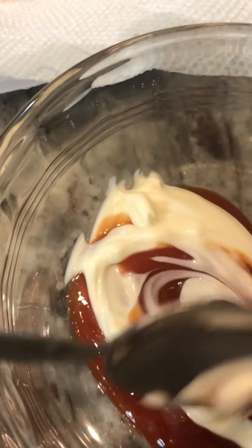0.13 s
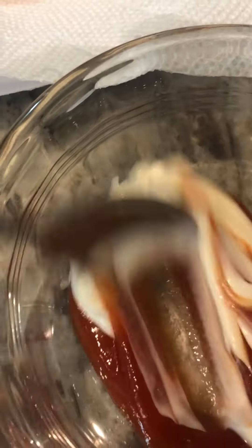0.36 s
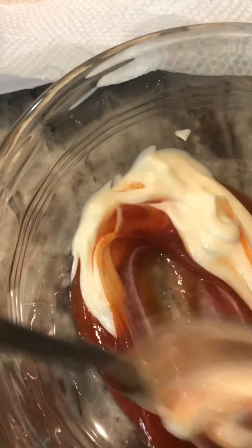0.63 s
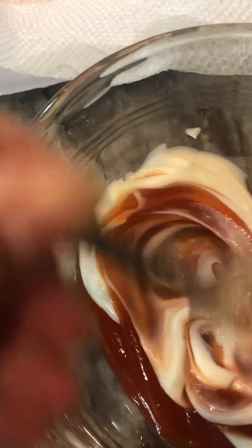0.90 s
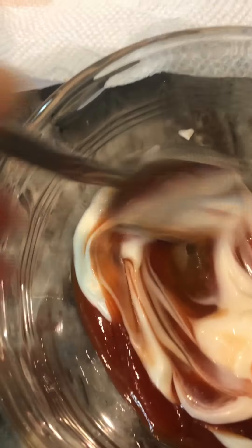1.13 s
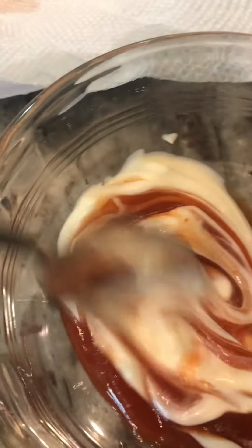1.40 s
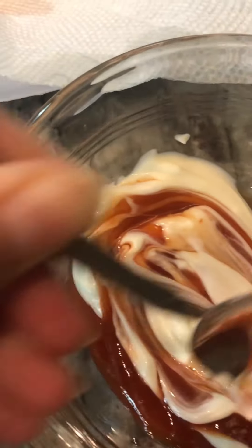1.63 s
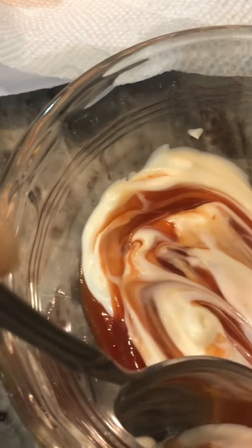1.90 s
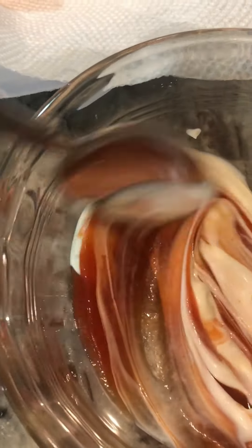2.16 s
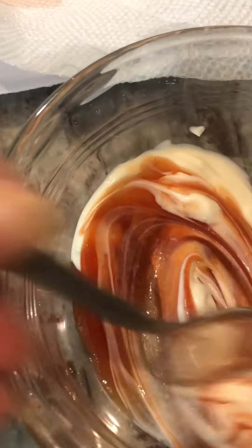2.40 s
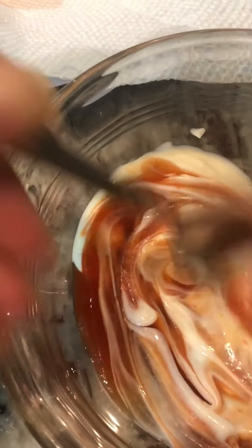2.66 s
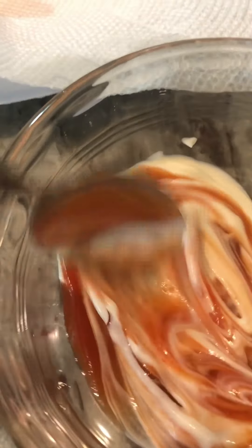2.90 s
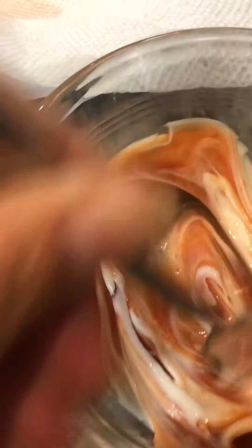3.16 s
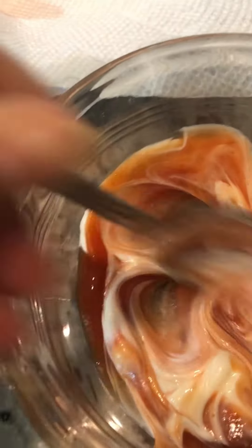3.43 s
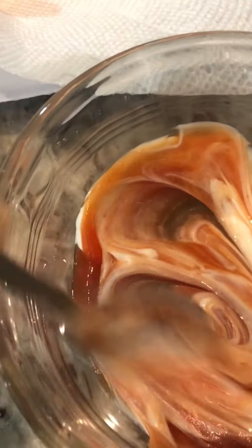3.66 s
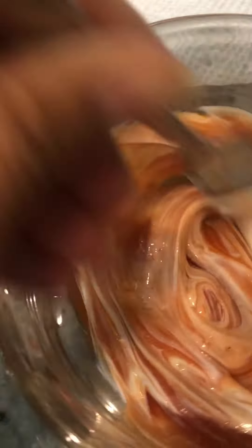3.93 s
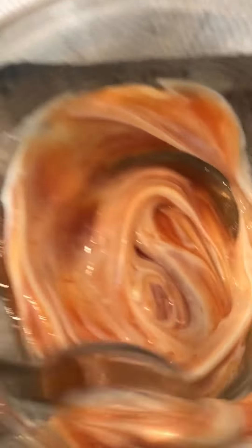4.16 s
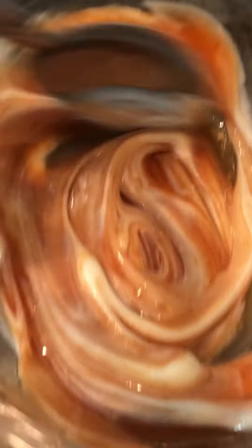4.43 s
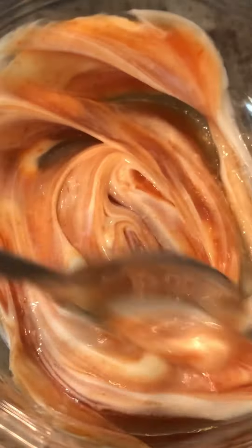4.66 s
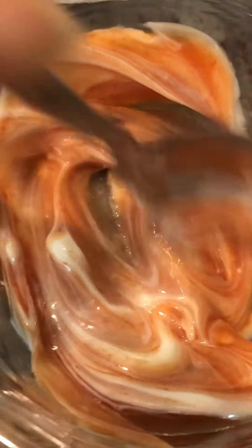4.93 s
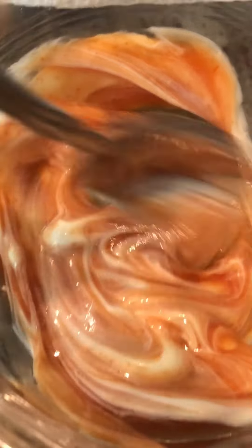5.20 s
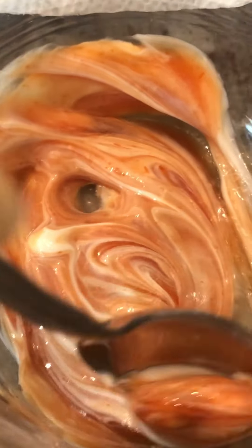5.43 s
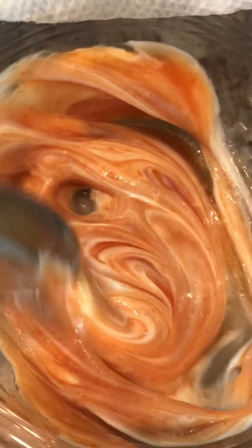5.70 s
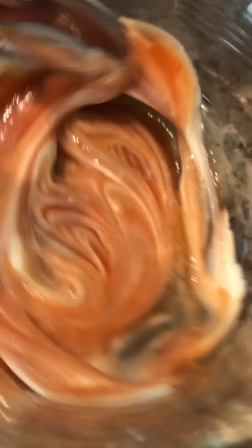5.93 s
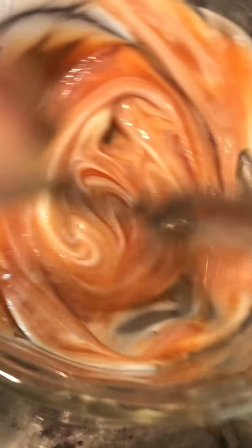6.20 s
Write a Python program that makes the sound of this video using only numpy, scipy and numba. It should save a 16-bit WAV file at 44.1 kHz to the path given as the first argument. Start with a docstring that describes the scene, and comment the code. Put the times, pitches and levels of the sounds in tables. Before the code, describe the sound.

Very close to a phone in a quiet kitchen with a soft, low appliance hum and a short hard-surfaced echo, a steel fork stirs thick sauce in a glass bowl. After a faint tick, firm bright clinks land at about 0.25, 0.46 and 0.57 s, then a run of light ticks and short gritty scrapes continues to 1.3 s. Single clinks come at 1.5 and 1.9 s, a stronger one at 2.2, and a sharp pair at 2.9. Rapid chattering scrapes follow. The hardest knock hits at 3.7 s, with a dull counter thump and brief glassy ring; more clinks fall at 3.8, 4.2 and 4.4. A tiny squeak at 4.5 and a longer, clean gliding squeak near 5 s sit among softer scrapes. Firm clinks at 5.4 and 5.7 s give way to scraping and faint catches until about 6.3 s.

```python
"""A steel fork stirs thick sauce in a glass bowl, close to a phone in a quiet kitchen with a soft hum.
Firm blows come from 0.25 s, then a run of light catches; noisy scrapes of the tines fill the gaps.
The hardest knock falls at 3.7 s; near 4.5 and 5 s a tine squeaks, as gliding tones with overtones.
Two more firm blows come at 5.4 and 5.7 s, then scraping and faint catches to the end.
Knocks are chatter driving damped modes, over a dull counter thump; the bare rim rings on as sines."""
import sys
import numpy as np
from scipy import signal
from scipy.fft import rfft, irfft
from scipy.io import wavfile
from scipy.ndimage import uniform_filter1d, minimum_filter1d
from numba import njit

SR = 44100
rng = np.random.default_rng(int(sys.argv[2]) if len(sys.argv) > 2 else 0)


def to_wav(sig):
    """Store sig (one row per channel, or 1-D mono) as 16-bit WAV at the path in sys.argv[1].

    Samples outside -1..1 are clipped; the rate is SR.
    """
    pcm = np.clip(np.atleast_2d(sig), -1, 1) * 32767
    pcm = np.round(pcm).astype(np.int16)
    wavfile.write(sys.argv[1], SR, pcm.T)  # frames by channels


def volts_from_decibels(level):
    """Turn decibel levels (scalar or array-like) into linear amplitude factors."""
    exponent = np.asarray(level, float) / 20
    return 10 ** exponent


N = 278712
T = np.arange(N) / SR


def level(x, db):
    """Scale to an rms level."""
    return x * volts_from_decibels(db) / np.sqrt(np.mean(x ** 2))


def add(out, start_s, x):
    """Mix x into out from start_s."""
    i = int(start_s * SR)
    out[i:i + len(x)] += x[:N - i]


def ring(t, hz, t60):
    """A decaying sine that falls 60 dB in t60 seconds."""
    return np.exp(-np.log(1000) * t / t60) * np.sin(2 * np.pi * hz * t)


def ring_width(t60):
    """Bandwidth in Hz of a mode with this t60; the same formula turns a width into a t60."""
    return np.log(1000) / (np.pi * t60)


def resonate(x, hz, t60):
    """Drive one decaying mode with x."""
    radius = np.exp(-np.log(1000) / (t60 * SR))
    poles = [1, -2 * radius * np.cos(2 * np.pi * hz / SR), radius * radius]
    return signal.lfilter([1 - radius], poles, x) * np.sin(2 * np.pi * hz / SR)


def walk(rate):
    """Random levels held 1 / rate s and slewed; spread near 1."""
    k = int(SR / rate)
    return 1.3 * uniform_filter1d(np.repeat(rng.standard_normal(N // k + 1), k), k)[:N]


@njit
def svf(x, hz, width):
    """State-variable band-pass whose centre moves, gain 1 at the centre."""
    y, b, l = np.empty(len(x)), 0., 0.
    for i in range(len(x)):
        g, k = np.tan(np.pi * hz[i] / SR), width / hz[i]
        v = (b + g * (x[i] - l)) / (1 + g * (g + k))
        b, l, y[i] = 2 * v - b, l + 2 * g * v, k * v
    return y


def band(x, modes):
    """Broad band that spans a group of modes, its top edge held to 9860 Hz."""
    edges = [0.79 * modes[0][0], min(1.27 * modes[-1][0], 9860)]
    return signal.sosfilt(signal.butter(2, edges, "band", fs=SR, output="sos"), x)


# the fork's three strongest modes shift as its grip and depth change:
# (time [s], tine [Hz], neck [Hz], tip [Hz])
FORK_PITCHES = [(0.0, 2370, 3860, 6470), (1.021, 2056, 4116, 6570), (1.881, 2400, 3846, 6590),
                (2.529, 2053, 4274, 6910), (3.339, 2240, 3930, 6270), (5.071, 2450, 4200, 6630),
                (5.23, 2414, 3830, 6270), (6.32, 2207, 4140, 6290)]


def main_pitches(s):
    """Pitch of each main mode at times s: the bowl's stays, the fork's three move."""
    bowl_hz = 1356.
    when, *fork = np.transpose(FORK_PITCHES)
    return [np.full(np.shape(s), bowl_hz)] + [np.interp(s, when, hz) for hz in fork]


# spectrum of the room's air, before scaling: (frequency [Hz], level [dB])
AIR_SPECTRUM = [(24, -29.5), (44, -6), (140, -3.5), (182, -14.5), (202, -7), (324, -4.5), (492, -20),
                (591, -8.5), (709, -20), (767, -18.5), (1870, -26.5), (15500, -36)]
# appliance hum bands: (frequency [Hz], width [Hz], level [dB])
HUM_BANDS = [(217.3, 7.9, -68), (332, 36, -68), (420, 49, -67), (586.5, 120, -70), (828, 2.9, -76.5)]


def kitchen(air_db=-60.5, waver_db=0.76):
    """Shaped noise gives the room tone; narrow noise bands give a wavering hum."""
    f = np.maximum(np.arange(N // 2 + 1) * SR / N, 1)
    hz, db = np.transpose(AIR_SPECTRUM)
    shape = volts_from_decibels(np.interp(np.log(f), np.log(hz), db))
    air = irfft(rfft(rng.standard_normal(N)) * shape, N)
    hum = sum(level(resonate(rng.standard_normal(N), hum_hz, ring_width(width)), hum_db)
              for hum_hz, width, hum_db in HUM_BANDS)
    return level(air, air_db) * volts_from_decibels(waver_db * walk(1.0)) + hum


def room(x, t60=0.19, tail_db=-21, dull_hz=5800, rise_s=0.0026):
    """Short diffuse tail of hard kitchen surfaces, duller than the source."""
    t = T[:int(.4 * SR)]
    tail = rng.standard_normal(len(t)) * np.exp(-np.log(1000) * t / t60) * (1 - np.exp(-t / rise_s))
    tail = signal.sosfilt(signal.butter(1, dull_hz, fs=SR, output="sos"), tail)
    return volts_from_decibels(tail_db) * signal.fftconvolve(x, tail / np.sqrt(np.sum(tail ** 2)))[:N]


# counter modes: (frequency [Hz], t60 [s], relative level [dB])
COUNTER_MODES = [(90, 0.11, -14.5), (202, 0.025, -6.5), (427, 0.084, 4.5), (537, 0.04, -2.5),
                 (710, 0.025, 3)]


def thuds(thud_db=-24, rock_s=0.014, top_db=-13):
    """The counter under the bowl answers the blows with a dull, short thump as the bowl rocks."""
    out, t = np.zeros(N), T[:int(.15 * SR)]
    shape = sum(volts_from_decibels(db) * ring(t, hz, t60) for hz, t60, db in COUNTER_MODES)
    for s, bowl_db, *_ in KNOCKS:
        rock = rng.standard_normal(len(t)) * np.exp(-t / rock_s)
        thump = signal.fftconvolve(rock / np.linalg.norm(rock), shape)[:len(t)]
        # blows above top_db thump no harder
        add(out, s, volts_from_decibels(min(bowl_db, top_db) + thud_db) * thump)
    return out


def catches(per_s):
    """Tiny random catches of steel on glass, a few much larger than the rest."""
    size_db = np.minimum(4 * rng.exponential(size=N), 14)
    hits = rng.random(N) < per_s / SR
    return level(hits * volts_from_decibels(size_db) * np.sign(rng.standard_normal(N)), 0)


# strokes of the tines over the glass:
# (start [s], length [s], fork level [dB], tilt towards the tip [dB], bowl level [dB])
STROKES = [(0.276, 0.098, -58, -1.5, -60), (0.471, 0.23, -58, 3, -55.5), (0.77, 0.079, -52, 1, -57.5),
           (0.866, 0.087, -51, 3, -60), (1.01, 0.031, -52, 2.5, -59), (1.073, 0.054, -54.5, -1, -61),
           (1.147, 0.097, -52.5, 3, -59), (1.276, 0.14, -64.5, 1.5, -67), (1.567, 0.12, -74.5, 0, -61.5),
           (1.924, .08, -64, -7, -58), (2.06, 0.095, -56.5, 3.5, -53), (2.24, 0.099, -52, 3.5, -52),
           (2.367, 0.08, -62, 1, -56.5), (2.454, 0.16, -59, -1.5, -65), (2.653, 0.062, -50, 1.5, -58),
           (2.825, 0.081, -54, 0.5, -66), (2.97, .07, -60, -3, -52), (3.048, .13, -50, -1, -55),
           (3.31, 0.058, -55, 0.5, -60), (3.458, 0.14, -61, -3, -61), (3.704, 0.14, -57, 3.5, -54),
           (3.875, .14, -56, -2, -52), (4.223, .12, -57.5, 4.5, -50.5), (4.397, .06, -58.5, 4.5, -48),
           (4.488, 0.064, -49, -3, -50), (4.678, 0.13, -57, 0.5, -61), (4.85, 0.19, -54.5, -3, -57.5),
           (5.076, 0.12, -68.5, -7.5, -67), (5.203, 0.086, -57, 2, -58.5), (5.455, 0.17, -66.5, -6, -59.5),
           (5.714, .15, -59, 4.5, -48), (5.853, 0.15, -70, 0, -45.5), (6.006, 0.14, -55, -3.5, -53.5),
           (6.177, 0.12, -65.5, -7, -48)]


def pressure(press=499.5, lift=449, bowl_lift=148.5):
    """Rubbing level in dB of bowl, tine, neck and tip: each stroke bites, holds and lifts off (dB/s)."""
    out = np.full((4, N), -95.)
    fall = np.array([[bowl_lift]] + [[lift]] * 3)
    for s, length, fork_db, tilt_db, bowl_db in STROKES:
        hold = np.array([[bowl_db], [fork_db - tilt_db], [fork_db], [fork_db + tilt_db]])
        before, after = np.maximum(s - T, 0), np.maximum(T - s - length, 0)
        out = np.maximum(out, hold - press * before - fall * after)
    return out


# broad rubbing noise beside the main mode of bowl, tine, neck and tip: (level [dB]) each
GRIT_DB = [-9.5, -10.5, -9.5, -6]
# smooth drag of sauce beside the catches, for bowl, tine, neck and tip: (level [dB]) each
WET_DB = [4, -9, -7, -2]


def scrape(wander=0.016, edge_hz=11800., edge_db=-9):
    """Rubbing noise and tiny catches come in surges and drive the moving modes of the fork."""
    columns = pressure()
    stutter, per_s = walk(70) + walk(20), 400
    shared = catches(2 * per_s) + volts_from_decibels(-1) * rng.standard_normal(N)
    shared = shared * volts_from_decibels(2.5 * stutter)
    out = 0
    groups = zip(columns, DAMPED_MODES, main_pitches(T), MAIN_MODES, GRIT_DB, WET_DB)
    for db, modes, hz, (width, _, _), grit_db, wet_db in groups:
        # each part chatters on its own, so each main mode gets its own catches
        force = catches(per_s) + volts_from_decibels(wet_db) * rng.standard_normal(N)
        force = force * volts_from_decibels(4 * walk(45) + 3 * walk(14)) + volts_from_decibels(-8) * shared
        main = svf(force, hz * (1 + wander * walk(25)), 1. * width)
        part = level(main, 0) + level(band(shared, modes), grit_db)
        out = out + volts_from_decibels(db) * level(part, 0)
    # a bright edge follows the tip's pressure
    edge = svf(catches(4 * per_s) * volts_from_decibels(3 * stutter), np.full(N, edge_hz), 500.)
    out = out + volts_from_decibels(edge_db + columns[-1]) * level(edge, 0)
    # the drag keeps the rim faintly singing
    singing = sum(volts_from_decibels(db) * svf(out, np.full(N, 1. * hz), ring_width(t60))
                  for _, hz, t60, db in RIM_MODES)
    return out + singing


# stick-slip locked to a tine: (start [s], length [s], settled pitch [Hz], level at the end [dB])
SQUEAKS = [(4.517, .005, 2380, -31), (4.534, 0.011, 2364, -27), (4.955, 0.07, 2349, -25.5)]
# fundamental and two overtones: (level [dB]) each
OVERTONES_DB = [-0.5, -18, -25]


def squeaks(waver=0.00366, flutter_db=1.32):
    """A tine sticks and slips at its own pitch: a clean tone with two overtones."""
    sag_hz, sag_s, swell = 100, 0.0097, 92  # pitch starts high and settles while it grows (dB/s)
    bite, cut_db, cut_s, fade = 2202, 20, .007, 201  # onset (dB/s), sudden slip, dying ring (dB/s)
    unsettled, rasp = 0.35, 0.36  # overtones wait for the pitch to settle (dB/Hz) and are rough
    out = 0
    for s, length, hz, end_db in SQUEAKS:
        since, past = T - s, np.maximum(T - s - length, 0)
        sharp = sag_hz * np.exp(-np.maximum(since, 0) / sag_s)
        pitch = hz + sharp
        phase = 2 * np.pi * np.cumsum(pitch * (1 + waver * walk(140))) / SR
        db = end_db - swell * np.clip(length - since, 0, length) - bite * np.maximum(-since, 0)
        db = db - cut_db * np.minimum(past / cut_s, 1) - fade * past
        for k, over_db in enumerate(OVERTONES_DB):
            flutter = (k + 2.0) * flutter_db * walk(120)
            gain = volts_from_decibels(db + over_db - k * unsettled * sharp + flutter)
            gain = gain * (1 + k * rasp * walk(700))
            out = out + np.sqrt(2) * gain * np.sin((k + 1) * phase)
    return out


# blows that set the rim ringing: (time [s], level [dB], favoured mode order 0-3,
# loss per order away [dB], upper twin of the split pair [dB])
RINGS = [(.2488, -35, 0., 6, -17), (.4623, -31.5, 0., 8, -1), (.5651, -28.5, 0., 6.5, -10.5),
         (.7609, -31.5, 2.1, 14, -17), (.9266, -40, 0., 26, 0), (1.2155, -45, 0., 26, 0.5),
         (1.5355, -38.5, 0., 14, 5), (1.8927, -28, 2.9, 3, -6), (2.0556, -39, 1.1, 9.5, 4),
         (2.9109, -25.5, 0., 9, 7), (2.9491, -21, 2.4, 8, 11), (3.2829, -51, 1.3, -2, -1),
         (3.7111, -19.5, 1.01, 9.5, 1), (3.8317, -32.5, 1.6, 13.5, -17), (4.2169, -13, 2.2, 7, 17),
         (4.3799, -20.5, 0., 27.5, -8), (5.4238, -26.5, 0., 4.5, -15.5), (5.6891, -16.5, 2.95, 6, 16.5),
         (6.2297, -31.5, 0., 41.5, 0)]
# rim modes: (place in RIM_ORDERS, frequency [Hz], t60 [s], relative level [dB])
RIM_MODES = [(0, 1420, .17, 0), (1, 3238, .19, -1), (2, 5658, .2, 0), (3, 5722, .08, -3), (4, 8708, .1, 0),
             (1, 3290, .12, -10), (1, 3230, .7, -17), (2, 5645, .6, -16), (4, 8690, .35, -18),
             (4, 12310, .16, -11)]
# mode order at each place; order 2 is a split pair: (order) each
RIM_ORDERS = np.array([0, 1, 2, 2, 3])


def rim(rise_s=0.00041, detune=0.00077, tremble_db=2.5):
    """The free wall of the bowl rings from the nearest knock on; its close modes beat."""
    out, t, blows = np.zeros(N), T[:int(.6 * SR)], np.transpose(KNOCKS)[0]
    for s, top_db, order, fall_db, twin_db in RINGS:
        start_db = top_db - fall_db * abs(RIM_ORDERS - order)
        start_db = start_db + twin_db * (np.arange(5) == 3)  # place 3 is the upper twin
        chance = rng.standard_normal(len(RIM_MODES))
        x = sum(volts_from_decibels(start_db[int(round(k))] + db) * ring(t, hz * (1 + detune * c), t60)
                for (k, hz, t60, db), c in zip(RIM_MODES, chance))
        nearest = blows[np.argmin(abs(blows - s))]
        add(out, nearest, x * (1 - np.exp(-t / rise_s)))
    # the fork stays in touch, so the ring trembles
    return out * volts_from_decibels(tremble_db * walk(90))


# tines, neck and tip along the fork: (place, 0 tines to 1 tip) each
PART_SPOTS = np.array([0, .5, 1])


def struck(fork_db, spot, soft):
    """Level of tines, neck and tip: the part nearest the contact sounds most, more so for light catches."""
    hard_fall_db, soft_fall_db = 12.5, 31  # loss over the fork's whole length
    fall_db = hard_fall_db + (soft_fall_db - hard_fall_db) * soft
    return fork_db - fall_db * abs(PART_SPOTS - np.clip(spot, 0, 1))


# fork meets glass, levels as rms of the first 5 ms:
# (time [s], bowl level [dB], fork level [dB], spot on the fork 0 tines to 1 tip)
KNOCKS = [(0.1743, -51, -60.5, 0.), (0.2487, -25, -16, 0.9), (0.307, -66, -35, 0.76), (.462, -19.5, -16, 1),
          (0.492, -52, -36, .99), (.5653, -21.5, -19.5, 0.88), (.6533, -79, -32.5, 0.83),
          (0.737, -71, -39, 0.26), (.7615, -30, -28.5, 0.73), (.819, -68, -38.5, 0.18),
          (0.8827, -65, -39, .99), (0.9252, -68, -29, 0.68), (0.94, -52, -41, .5), (1.009, -71, -42, .99),
          (1.026, -73, -34, 0.41), (1.043, -70, -47, 0.98), (1.076, -65, -43, .99),
          (1.0844, -70, -47, 0.055), (1.101, -60, -46, 0.), (1.147, -73, -44.5, 0.), (1.185, -70, -39, 0.),
          (1.2155, -78.5, -34.5, 1), (1.319, -72, -57.5, .5), (1.5351, -24, -21.5, 0.89),
          (1.596, -47, -51, 0.84), (1.8927, -28.5, -20.5, 0.46), (2.056, -35.5, -33.5, .3),
          (2.134, -44, -33.5, 0.71), (2.1504, -70, -46, .99), (2.2225, -18, -12, 0.94),
          (2.3437, -66, -46, 0), (2.496, -74, -44, .52), (2.6719, -73, -34, 0.3), (2.714, -76, -33.5, 1),
          (2.7365, -49.5, -41, 0.96), (2.806, -63, -44.5, 0.96), (2.8967, -65, -38, 0.3),
          (2.9113, -17.5, -10.5, 1), (2.93, -45, -48, 0.), (2.9491, -16.5, -15.5, 0.66),
          (3.0422, -63, -38.5, 0.061), (3.0574, -53, -41.5, 0.94), (3.0835, -68, -33, 0.2),
          (3.1, -67, -35, 0.93), (3.113, -70, -36, 0.83), (3.126, -74, -34.5, 0.78),
          (3.1553, -38, -30, 0.089), (3.2829, -28.5, -22.5, 0.52), (3.3185, -65, -46.5, 0.),
          (3.4105, -41.5, -35, 0.2), (3.4411, -72, -43, 1), (3.469, -77, -46, .99), (3.7116, -6, -6.5, 1),
          (3.8314, -25, -19.5, 0.65), (3.9467, -43.5, -46, 0.92), (3.9674, -46, -42, 0.91),
          (4.002, -41.5, -49, 0.32), (4.019, -70, -50, .5), (4.031, -60, -50, .8),
          (4.073, -69.5, -48.5, 0.77), (4.1785, -33, -39.5, 0.23), (4.2168, -25.5, -11, 0.8),
          (4.309, -41, -58, 0.), (4.331, -46, -54, .49), (4.344, -67, -47, .99), (4.38, -16.5, -15.5, 0.73),
          (4.514, -41, -32.5, 0.22), (4.7854, -47, -39, 0.23), (4.8028, -32, -31, 0.13),
          (4.841, -44, -59, 0), (4.9518, -70, -38.5, 0.85), (5.076, -45.5, -64, 0.),
          (5.1283, -32, -37.5, 0.41), (5.1818, -40, -46.5, 0.085), (5.2247, -47.5, -41, 0.25),
          (5.2578, -58.5, -34.5, 0.62), (5.4237, -26.5, -15.5, 0.26), (5.598, -48.5, -60, 0.39),
          (5.6895, -22.5, -14.5, 0.52), (6.0164, -54, -41, 0.24), (6.1965, -64, -46.5, 0.),
          (6.23, -59, -56, 0.)]
# parts damped by sauce and hand, one list each for bowl, tines, neck and tip:
# (frequency [Hz], t60 [s], relative level [dB])
DAMPED_MODES = [
    [(1120, .02, -10), (1290, .03, 0), (1500, .02, -4)],
    [(1780, .02, -5), (2480, .025, -2), (2750, .02, -6)],
    [(3150, .02, -4), (3600, .02, -1), (4810, .018, -4), (5250, .018, -6)],
    [(6150, .018, -2), (7200, .018, 0), (7900, .016, -3), (8900, .014, -4), (10300, .014, -7),
     (11700, .014, -10), (13700, .01, -23), (14900, .01, -25)],
]
# strongest mode of bowl, tine, neck and tip:
# (width when rubbed [Hz], t60 when struck [s], relative level when struck [dB])
MAIN_MODES = [(250, .03, 0), (110, .045, 3), (220, .03, 2), (400, .025, 2)]


def knocks(detune=0.035, chatter_s=0.00083, crack_s=0.002):
    """Each contact is a millisecond or so of chatter into the damped modes, at its own spot on the fork."""
    out, t = np.zeros(N), T[:int(.09 * SR)]
    first = int(.005 * SR)
    scatter_db, soft_db = 3.5, 10  # chance level of each mode, main mode's lift in light catches
    for s, bowl_db, fork_db, spot in KNOCKS:
        # light catches skid for longer than hard blows
        soft = np.clip((-24 - max(bowl_db, fork_db)) / 16, 0, 1)
        parts = [bowl_db, *struck(fork_db, spot, soft)]
        skid_s = chatter_s * (1 + 2.0 * soft)
        push = rng.standard_normal(len(t)) * np.exp(-t / skid_s)
        push[0] += 3.75 * (1 - soft)
        groups = zip(parts, DAMPED_MODES, main_pitches(s), MAIN_MODES)
        for db, modes, main_hz, (_, main_t60, main_db) in groups:
            every = modes + [(main_hz, main_t60, main_db + soft_db * soft)]
            chance = rng.standard_normal((len(every), 2))
            shape = sum(volts_from_decibels(mode_db + scatter_db * a) * ring(t, hz * (1 + detune * b), t60)
                        for (hz, t60, mode_db), (a, b) in zip(every, chance))
            x = signal.fftconvolve(push, shape)[:len(t)]
            # countless short modes of the glass blur into a dry crack
            crack = band(rng.standard_normal(len(t)) * np.exp(-t / crack_s), modes)
            x = x / np.std(x[:first]) + volts_from_decibels(-5.7 * soft) * crack / np.std(crack[:first])
            add(out, s, x * volts_from_decibels(db) / np.std(x[:first]))
    return out


def scene():
    """Fork and bowl, too small to radiate bass, their echo, counter, scrapes and room tone."""
    squeak = squeaks()
    no_bass = signal.butter(4, 1115, "high", fs=SR, output="sos")
    bowl = signal.sosfilt(no_bass, knocks() + rim() + squeak)
    # while a tine is locked into its squeak it stops rubbing at random
    unlocked = 1 / (1 + uniform_filter1d(abs(squeak), size=400) / volts_from_decibels(-33))
    return (bowl + room(bowl) + thuds() + unlocked * scrape() + kitchen())[None]


def band_limit(x):
    """A steep low-pass at the top of the band."""
    return signal.sosfilt(signal.butter(12, 17010, fs=SR, output="sos"), x)


def record(dry):
    """A fast limiter holds the loudest clinks under full scale; the phone cuts the top."""
    gain = np.minimum(1, .87 / (abs(dry) + 1e-9))
    gain = uniform_filter1d(minimum_filter1d(gain, size=89), size=44)
    top_cut = signal.ellip(8, .2, 70, 15900, fs=SR, output="sos")
    mix = signal.sosfilt(top_cut, dry * gain)
    return band_limit(mix)


dry = scene()
out = record(dry)
to_wav(out)
```